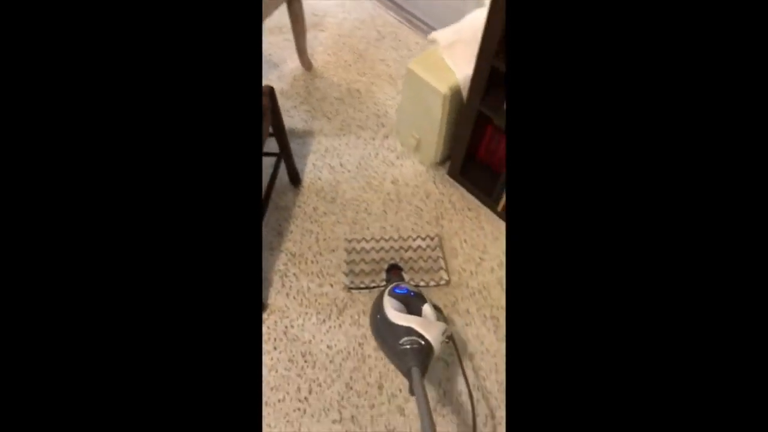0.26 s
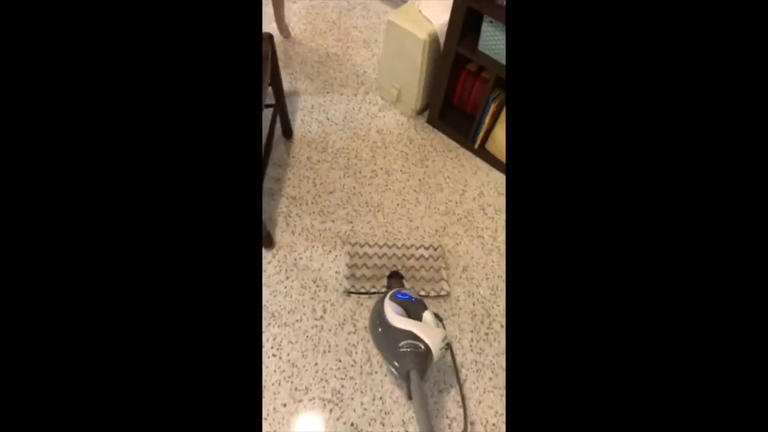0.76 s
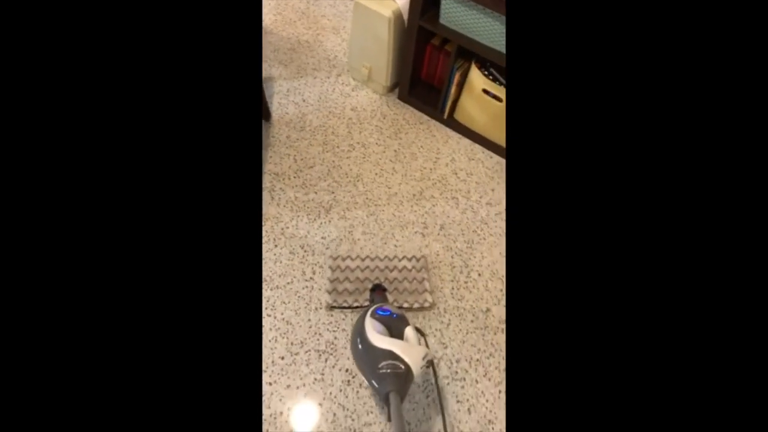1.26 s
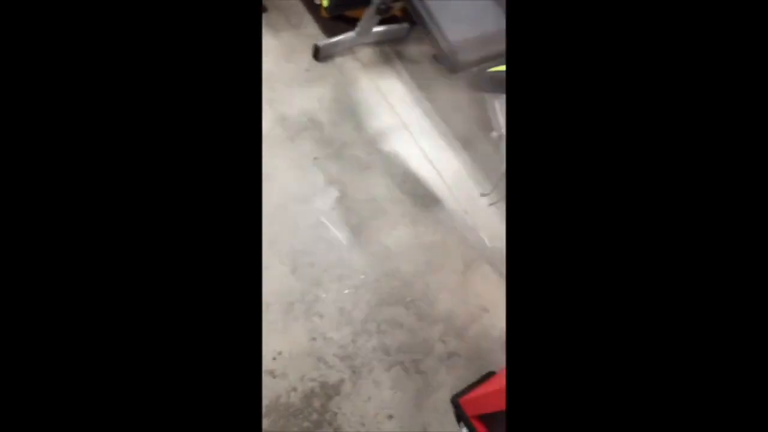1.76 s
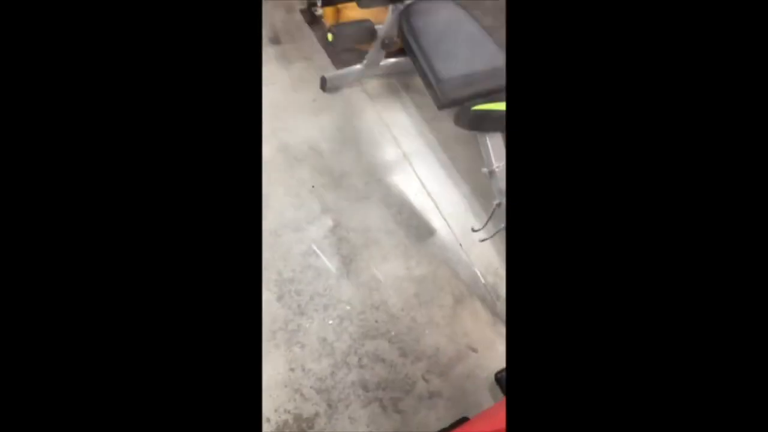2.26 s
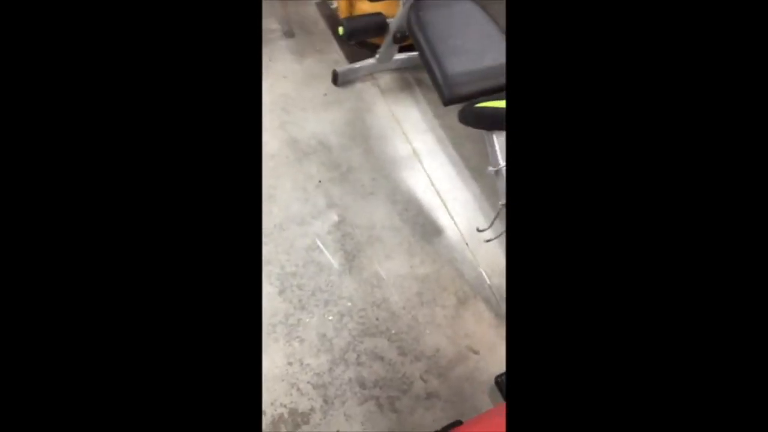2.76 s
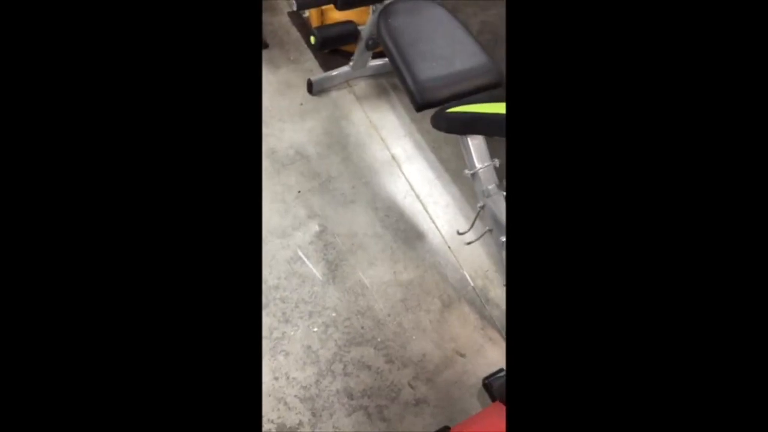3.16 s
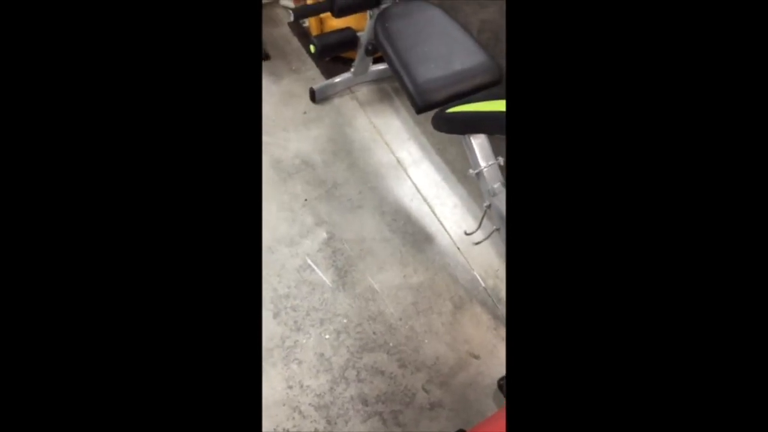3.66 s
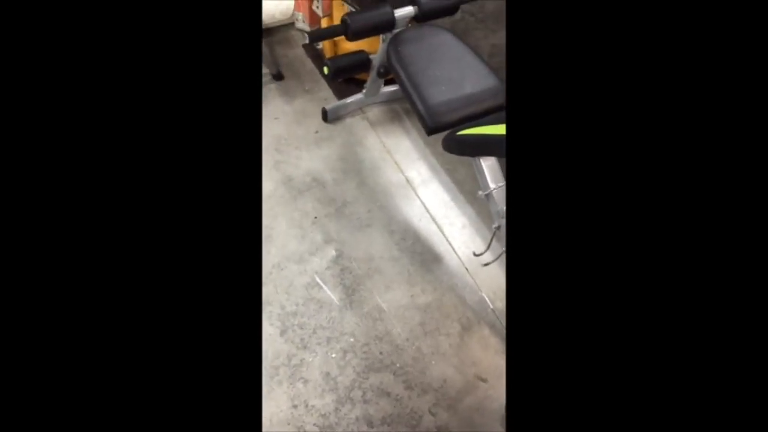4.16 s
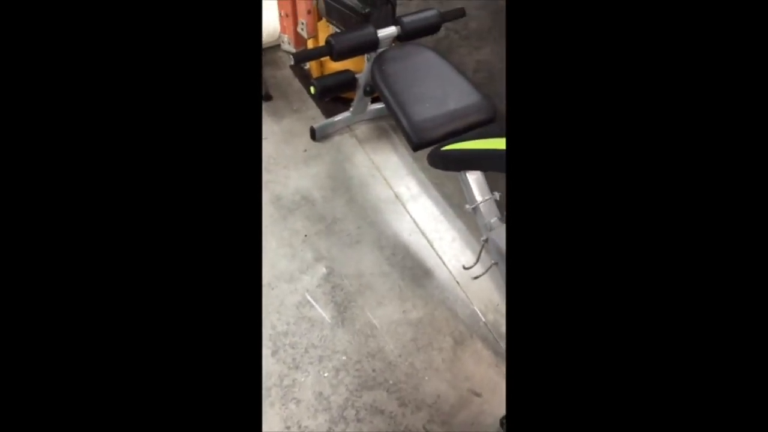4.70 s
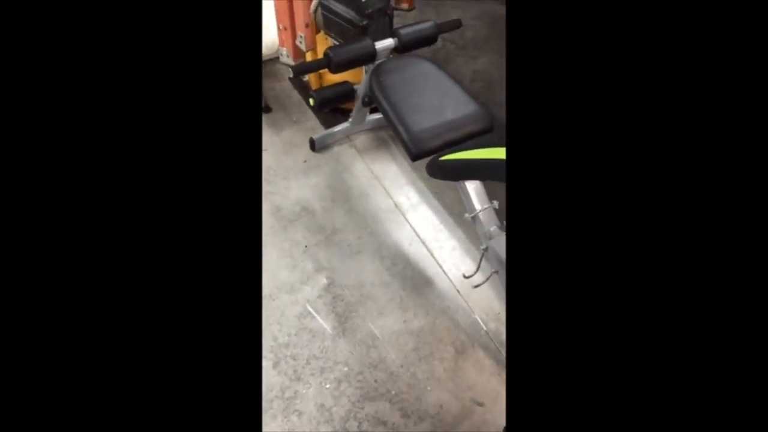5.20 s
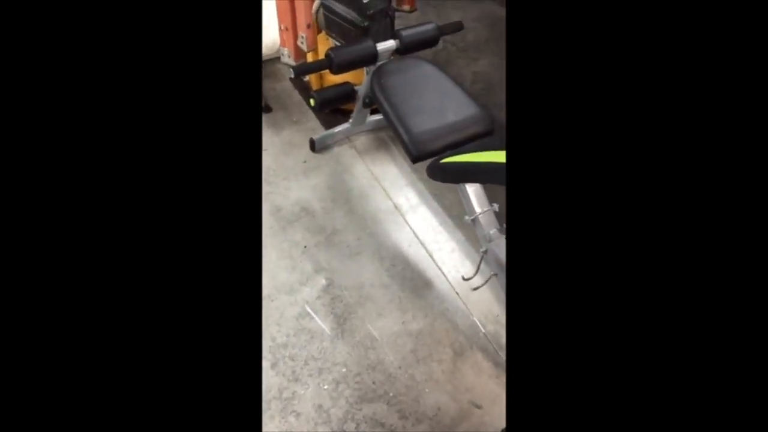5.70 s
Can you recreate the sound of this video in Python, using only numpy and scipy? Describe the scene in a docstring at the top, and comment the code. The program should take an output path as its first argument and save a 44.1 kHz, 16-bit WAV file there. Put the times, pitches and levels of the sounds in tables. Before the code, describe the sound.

A steam mop hisses and hums, then a steamer pumps and hisses in a garage, with plastic knocks on concrete.

```python
"""A steam mop on a hard floor, close to a mono phone microphone: steam hisses out under the pad and the
heater hums. After a short silence, a garage: a steamer's pump thuds fifteen times a second under a thin
nozzle hiss, while its plastic case knocks, clatters and drags on concrete and the walls answer.
Just after the garage comes in, the sound drops out once more for a moment."""
import sys
import numpy as np
from scipy import signal
from scipy.fft import rfft, irfft, next_fast_len
from scipy.io import wavfile
from scipy.ndimage import uniform_filter1d, map_coordinates

SR = 44100
rng = np.random.default_rng(int(sys.argv[2]) if len(sys.argv) > 2 else 0)


def transcribe(signal):
    """Save signal, clipped to [-1, 1], as a 16-bit WAV file at the path in sys.argv[1]."""
    frames = np.atleast_2d(signal).T
    limited = np.clip(frames, -1, 1)
    pcm = np.round(limited * 32767).astype(np.int16)
    wavfile.write(sys.argv[1], SR, pcm)


N = 261954
TIME = np.arange(N) / SR

# how hard the steamer works: t/s, steam level/dB, pump level/dB
STEAMER_LEVELS = [(1.645, -73.5, -61), (1.705, -58, -59.5), (1.75, -68.5, -69), (1.85, -63.5, -68.5),
                  (2.0, -64.5, -63.5), (2.28, -74, -79), (2.45, -75.5, -66), (2.55, -70.5, -57.5),
                  (3.17, -69.5, -57.5), (3.24, -62.5, -55), (3.4, -65.5, -59), (3.75, -65.5, -56.5),
                  (4.2, -65, -58), (4.8, -67, -57), (5.05, -64.5, -60), (5.3, -62.5, -57.5),
                  (5.65, -58, -60), (5.94, -61.5, -58)]
PUMP_HZ, PUMP_START_S = 15, 1.644


def amp(db):
    """Decibels to gain."""
    return 10 ** (np.asarray(db) / 20)


def unit(x):
    """Scaled to rms 1."""
    return x / np.sqrt(np.mean(x ** 2) + 1e-20)


def along(points, hz):
    """Join (f/Hz, value) points on a log frequency axis."""
    f, values = np.transpose(points)
    return np.interp(np.log(hz + 1), np.log(f + 1), values)


def curves(rows):
    """One value per sample for each column after the time."""
    times, *columns = np.transpose(rows)
    return [np.interp(TIME, times, column) for column in columns]


def wobble(rate):
    """A smooth random curve, rate knots a second."""
    return map_coordinates(rng.standard_normal(int(N * rate / SR) + 4), [TIME * rate])


def filtered(x, response):
    """x shaped by a frequency response."""
    size = next_fast_len(len(x) + 8192)
    return irfft(rfft(x, size) * response(np.fft.rfftfreq(size, 1 / SR)), size)[:len(x)]


def resonant(modes, power=1):
    """The response of (f/Hz, width/Hz, level/dB) resonances, raised to a power."""
    return lambda f: sum((-1) ** k * amp(db) * 1j * f * width / (hz * hz - f * f + 1j * f * width)
                         for k, (hz, width, db) in enumerate(modes)) ** power


def coloured(points):
    """The response of a (f/Hz, level/dB) spectrum."""
    return lambda hz: amp(along(points, hz))


def rush(response, patchy_db):
    """Coloured noise of rms 1 with patches of random gain in time and frequency."""
    spectra = signal.stft(rng.standard_normal(N), nperseg=512)[2]
    patches = uniform_filter1d(rng.standard_normal(spectra.shape), size=5, axis=0)
    patches = unit(uniform_filter1d(patches, size=10, axis=1))
    noise = signal.istft(spectra * amp(patchy_db * patches), nperseg=512)[1][:N]
    return unit(filtered(noise, response))


def ringing(hz, db, t60, rise, t):
    """One damped mode that swells first."""
    return amp(db - 60 * t / t60) * np.sin(2 * np.pi * hz * t) * (1 - np.exp(-t / max(rise, 1e-4)))


def indoors(x, t60, wet_db):
    """A sound plus its reflections, at rms 1; they drift as source and microphone move."""
    t = np.arange(SR // 2) / SR
    tails = rng.standard_normal((2, len(t))) * amp(-60 * t / t60)
    here, there = signal.fftconvolve(x[None], tails / np.linalg.norm(tails[0]), axes=1)[:, :N]
    turn = 1.75 * wobble(2.492)
    return unit(x + amp(wet_db) * (np.cos(turn) * here + np.sin(turn) * there))


def mop_steam():
    """Steam rushes out under the pad, close up, and sinks as the mop draws away from the microphone."""
    # spectra of the steam jet, its fizz and its rumble: f/Hz, level/dB
    jet_colour = [(160, -37), (280, -7.5), (404, -10), (427, -8), (543, -13.5), (638, -2), (699, -5.5),
                  (996, 0), (1590, -2), (2070, -4), (2540, 0.5), (3840, -17), (4300, -43), (5590, -44.5),
                  (9460, -120)]
    fizz_colour = [(2240, -24), (3800, -19), (4180, -11), (4790, -7), (5240, 0), (5980, 0.5), (7150, -5),
                   (8050, -15), (9130, -20), (10700, -9), (11800, -13), (13100, -0.5), (13600, -6.5),
                   (14600, -15), (15800, -24)]
    rumble_colour = [(12, -38), (20, -19), (48, -7.5), (209, -5.5), (238, -6), (277, -18), (330, -12.5),
                     (430, -43.5), (730, -120)]
    # the cavity under the mop head: f/Hz, width/Hz, level/dB
    cavity = [(810, 140, -1), (1080, 180, 0)]
    start_db, fade_db_per_s = -39, 2
    hollow_db = -14.5 + 10 * np.exp(-((TIME - 0.32) / 0.14) ** 2)  # swells once, early in the stroke
    hollow = amp(hollow_db) * indoors(rush(resonant(cavity, power=2), patchy_db=2.5), t60=0.3, wet_db=-2.5)
    sputter = amp(0.67 * wobble(40.4))  # droplets make the flow uneven
    jet = amp(1.5) * indoors(rush(coloured(jet_colour), patchy_db=1.2), t60=0.3, wet_db=-2.5)
    fizz = amp(-2) * indoors(rush(coloured(fizz_colour), patchy_db=1.75), t60=0.16, wet_db=-8.5)
    rumble = amp(-10) * rush(coloured(rumble_colour), patchy_db=-0.5)
    return amp(start_db - fade_db_per_s * TIME) * (sputter * (jet + fizz + hollow) + rumble)


def mop_whistles():
    """Narrow bands of noise ride on the steam as unsteady tones."""
    # whistles: f/Hz, width/Hz, level/dB
    tones = [(439.5, 2.1, -65.5), (622, 12, -62.5), (906, 9, -72), (1028, 8.1, -55.5), (1453, 30, -51.5)]
    return sum(amp(db) * rush(resonant([(hz, width, 0)]), patchy_db=4) for hz, width, db in tones)


def heater_hum(hz=241.2, db=-52):
    """Mains hum of the mop's heater, wavering a little in level."""
    return amp(db + 1.2 * wobble(6)) * np.sin(2 * np.pi * hz * TIME)


def garage_air(db=-60, rise_from_s=5.19, rise_db_per_s=7):
    """Room tone: a low rumble that grows towards the end."""
    # rumble spectrum: f/Hz, level/dB
    colour = [(12, -53), (20, -13), (161, 1.5), (305, -13), (375, -14), (426, -36), (484, -21), (549, -18),
              (900, -36), (1170, -65), (1980, -120)]
    level = amp(db + rise_db_per_s * np.maximum(TIME - rise_from_s, 0))
    return level * rush(coloured(colour), patchy_db=1.5)


def mic_hiss():
    """The microphone's faint noise floor in the garage."""
    # hiss spectrum: f/Hz, level/dB
    colour = [(350, -58), (600, -14), (943, -6.5), (1020, -6), (1870, -17.5), (2980, -15), (3230, -16),
              (15800, -31)]
    return amp(-74.5) * rush(coloured(colour), patchy_db=1.5)


def nozzle():
    """Steam whines and hisses through the steamer's nozzle; each pump stroke pushes a puff."""
    # lower and upper nozzle resonances: f/Hz, width/Hz, level/dB
    whine_modes = [(1050, 220, -13.5), (1392, 246, -2.5), (1672, 174, -1), (1999, 180, -0.5)]
    sizzle_modes = [(3010, 520, -4.5), (5440, 700, -1.5), (8540, 2200, -6)]
    # steam hiss spectrum: f/Hz, level/dB
    hiss_colour = [(1380, -22), (2350, -6), (2910, 1), (3340, -1.5), (4340, -2), (4820, -12), (5390, -0.5),
                   (6680, -29.5), (7230, -12.5), (8350, -7.5), (9560, -10), (10400, -17), (13300, -13),
                   (15800, -19.5)]
    steam_db, _ = curves(STEAMER_LEVELS)
    usual_steam_db = -64.5
    hiss_db = -69.5 + 1.04 * (steam_db - usual_steam_db)
    puffs = np.cos(2 * np.pi * PUMP_HZ * (TIME - PUMP_START_S - 0.02))
    gust = wobble(22) + 0.37 * puffs
    whine = indoors(rush(resonant(whine_modes, power=2), patchy_db=2.5), t60=0.3, wet_db=-3)
    hiss = rush(coloured(hiss_colour), patchy_db=2.5)
    sizzle = amp(-7) * rush(resonant(sizzle_modes, power=2), patchy_db=4.5)
    spray = indoors(hiss + sizzle, t60=0.13, wet_db=-3.5)
    return amp(steam_db + 1.47 * gust) * whine + amp(hiss_db + 1.3 * gust) * spray


def pump(jitter_s=0.0005, spread_db=1.5):
    """Nearly even pump strokes set the steamer's housing ringing."""
    # housing modes: f/Hz, level/dB, t60/s, delay/s, rise/s
    housing = [(121, -8.5, 0.2, 0.0114, 0.0036), (163.3, -0.5, 0.31, 0.01825, .012),
               (212.3, 1.5, 0.14, 0.00039, 0.0048), (290.4, 0, 0.083, 0.01082, 0.0029),
               (431.4, -7, 0.093, 0.00062, 0.0017), (553.6, -6, 0.062, 0.00495, 0.0014),
               (670, -11.5, 0.053, 0.00309, 0.00078)]
    _, pump_db = curves(STEAMER_LEVELS)
    t = np.arange(SR // 3) / SR
    thud = sum(ringing(hz, db, t60, rise, np.maximum(t - delay, 0)) for hz, db, t60, delay, rise in housing)
    starts = np.arange(PUMP_START_S * SR, N - 1, SR / PUMP_HZ)
    late, force = rng.standard_normal((len(starts), 2)).T
    strokes = np.zeros(N + SR)
    strokes[(starts + jitter_s * SR * late).astype(int)] = amp(spread_db * force)
    return amp(pump_db) * unit(signal.fftconvolve(strokes, thud)[:N])


def knocks():
    """The case hits concrete: a short shell ring, a click, the hollow body, the slab, then the walls."""
    # contacts: t/s, level/dB, shell f/Hz, then relative to that level: click/dB, body/dB, slab/dB, walls/dB
    contacts = [(1.652, -50.5, 918, -11, -2, -17, -23), (2.053, -47, 2400, 9, -21, -37, -12),
                (2.079, -36.5, 840, 0, -30, -40, -26), (2.087, -45.5, 890, -14, -20, -29, -33),
                (2.100, -49, 1820, -16, -14, -35, -36), (2.137, -49, 2000, -17, -14, -29, -27),
                (2.377, -36.5, 1250, -7, -27, -44, -25), (2.381, -32.5, 980, -20, -18, -37, -36),
                (2.466, -49, 945, -17, -12, -19, -15), (2.5425, -13, 1450, -6.5, -26, -34, -25.5),
                (2.546, -20, 1900, 3, -2.5, -22.5, -27.5), (2.821, -40, 1370, -3, -4, -16, -23),
                (2.837, -31.5, 1170, -13, -22, -30, -39), (2.9286, -17, 1120, -3, -13, -34, -29),
                (2.9313, -11, 880, -23, -6.5, -54, -26), (3.163, -26.5, 860, -23, -4.5, -46, -26.5),
                (3.26, -44.5, 1730, 4, -1, -20, -20), (3.448, -40, 2240, -7, -5.5, -22, -24),
                (3.456, -44, 740, -11, 0, -15.5, -20), (3.509, -37.5, 1970, 0.5, -23, -30, -22.5),
                (5.081, -41.5, 1690, 2, -16, -29, -30), (5.6205, -42.5, 1170, -14, -18, -35, -20),
                (5.634, -38.5, 1380, -13, -21, -38, -30)]
    # modes of the hollow case, and of the floor with what stands on it: f/Hz, level/dB, t60/s
    body_modes = [(178.2, -1.5, 0.099), (164.5, -9.5, 0.55), (191.7, -7.5, 0.43), (357, 2, 0.043),
                  (634, -25, 0.095), (776, -12.5, 0.084), (1274, -8.5, 0.058)]
    slab_modes = [(69, 9, 0.41), (88, -31, .25), (218.6, 11.5, 0.36), (290, -32, 0.42)]
    out, t = np.zeros(N + SR), np.arange(SR) / SR
    click_band = signal.butter(2, [1500, 5500], "bandpass", fs=SR)
    for start, db, shell_hz, click_db, body_db, slab_db, walls_db in contacts:
        shell_t60 = 0.013 * (1000 / shell_hz) ** 0.77  # a higher ring dies sooner
        shell = ringing(shell_hz, 3.47, shell_t60, 0.00061, t)
        shell += ringing(1.69 * shell_hz, -4, 0.54 * shell_t60, 0.00025, t)
        click_shape = amp(click_db - 60 * t / 0.013) * (1 - np.exp(-t / 0.00094))
        click = signal.lfilter(*click_band, click_shape * rng.standard_normal(len(t)))
        body = sum(ringing(hz, body_db + level, t60, 0.0048, t) for hz, level, t60 in body_modes)
        slab = sum(ringing(hz, slab_db + level, t60, 0.027, t) for hz, level, t60 in slab_modes)
        answer = amp(walls_db) * walls(tilt_db_per_octave=2 * np.log2(shell_hz / 1270))
        out[round(start * SR):][:len(t)] += amp(db) * (shell + click + body + slab + answer)
    return out[:N]


def walls(tilt_db_per_octave):
    """The garage's reverberant tail after one knock; each frequency dies at its own speed."""
    # reverberation time: f/Hz, t60/s
    decay = [(100, 0.97), (250, 0.71), (600, 0.43), (1200, 0.5), (3000, 0.3), (6000, 0.34), (12000, 0.11)]
    # spectrum of the reflections: f/Hz, level/dB
    colour = [(60, -51), (180, 7), (400, -3.5), (1000, 2.5), (2500, -4.5), (5000, -20), (9000, -24),
              (15000, -26.5)]
    hz, frame_s, spectra = signal.stft(rng.standard_normal(SR), SR, nperseg=256)
    colour_db = along(colour, hz) + tilt_db_per_octave * np.log2((hz + 1) / 1000)
    spectra *= amp(colour_db[:, None] - 60 * frame_s / along(decay, hz)[:, None])
    tail = signal.istft(spectra, SR, nperseg=256)[1][:SR]
    early_rms = np.sqrt(np.mean(tail[:SR // 20] ** 2))
    return tail / early_rms * (1 - np.exp(-TIME[:SR] / 0.0005))


def scuff(attack_db_per_s=450, release_db_per_s=150):
    """Plastic slides unevenly over rough concrete: each drag swells fast, holds and trails off."""
    # drags of the case: t/s, hold/s, level/dB
    drags = [(2.084, 0.0067, -62), (2.63, 0.12, -61)]
    # spectrum of the grit: f/Hz, level/dB
    grit = [(600, -18), (1200, -2), (2500, 5.5), (4600, -5.5), (7000, -10.5), (12000, -24)]
    level = sum(amp(db - attack_db_per_s * np.maximum(start - TIME, 0)
                    - release_db_per_s * np.maximum(TIME - start - hold, 0)) for start, hold, db in drags)
    return level * amp(1.9 * wobble(60)) * rush(coloured(grit), patchy_db=-1.0)


def scene(garage_from_s=1.6):
    """The mop's room, then the garage; one microphone feeds both channels."""
    # response of the microphone as held in the garage: f/Hz, gain/dB
    mic = [(20, -38), (45, -1.5), (9700, 1.5), (10350, -1.5), (11000, 2)]
    garage = pump() + garage_air() + nozzle() + knocks() + scuff() + mic_hiss()
    mop = mop_steam() + mop_whistles() + heater_hum()
    sound = np.where(TIME < garage_from_s, mop, filtered(garage, coloured(mic)))
    return np.array([sound, sound])


def record(dry, top_hz=15750):
    """The sound cuts off and fades back in twice; nothing passes above the band limit."""
    # stretches with sound: from/s, to/s, fade-in/s
    stretches = [(-1, 1.535, .001), (1.633, 1.855, 0.017), (1.907, 7, 0.0082)]
    gate = sum(np.clip((TIME - start) / fade, 0, 1) ** 2 * (TIME < end) for start, end, fade in stretches)
    return np.array([filtered(gate * channel, lambda hz: hz < top_hz) for channel in dry])


dry = scene()
out = record(dry)
transcribe(out)
```